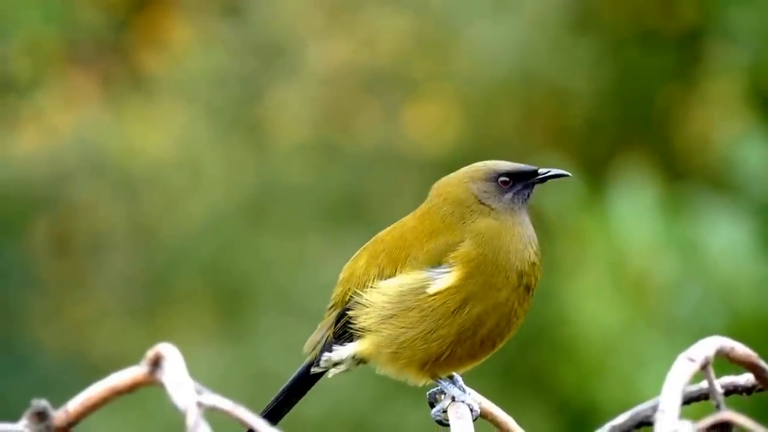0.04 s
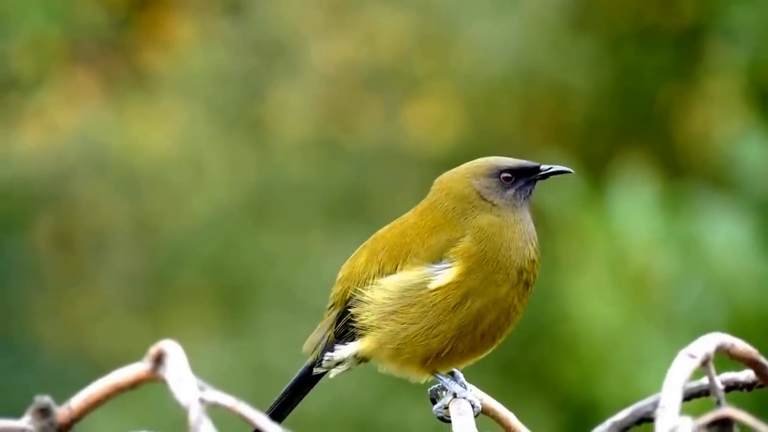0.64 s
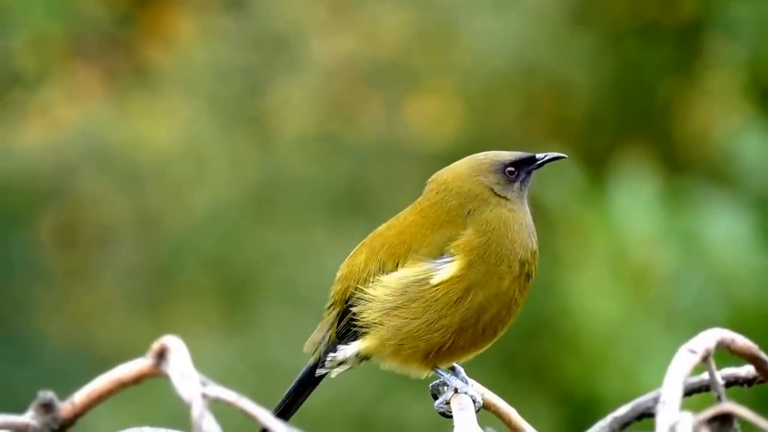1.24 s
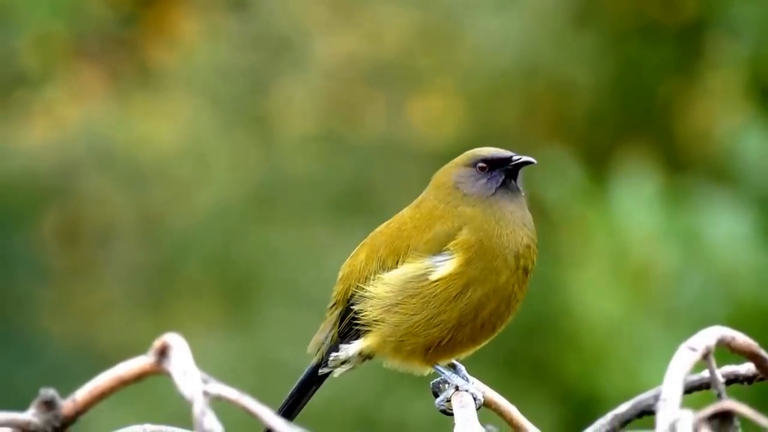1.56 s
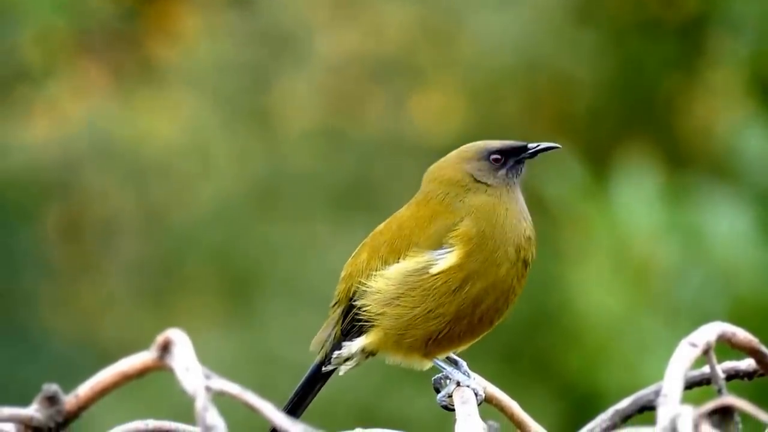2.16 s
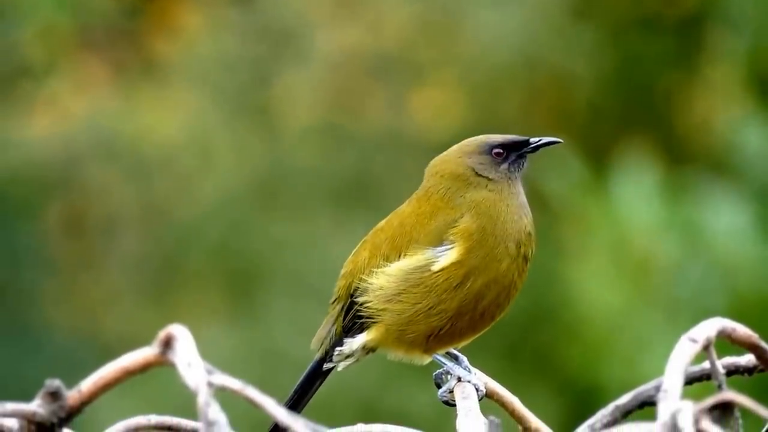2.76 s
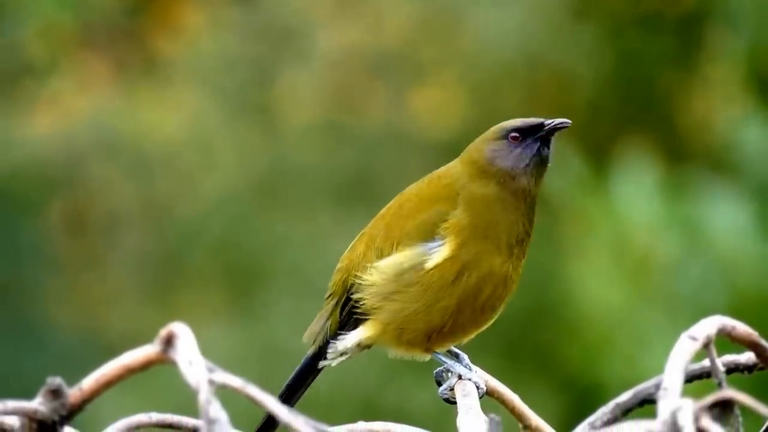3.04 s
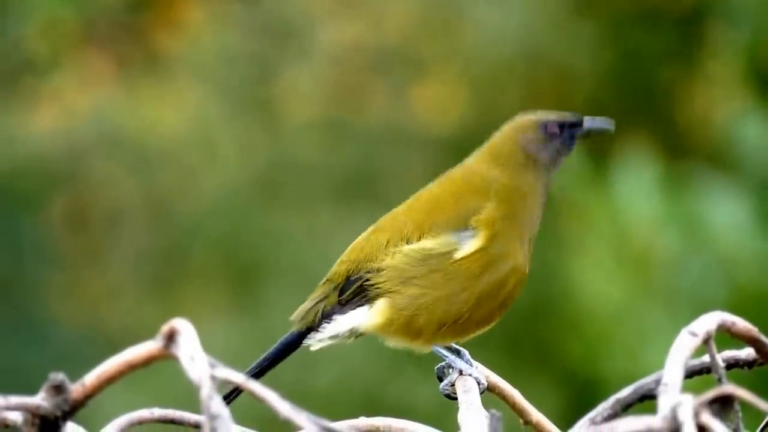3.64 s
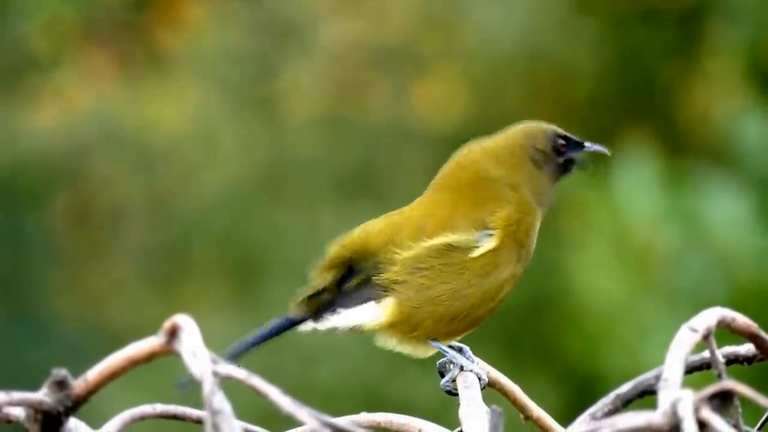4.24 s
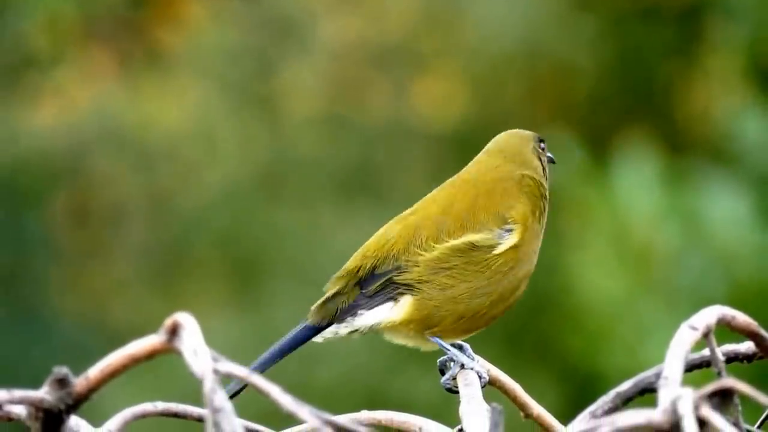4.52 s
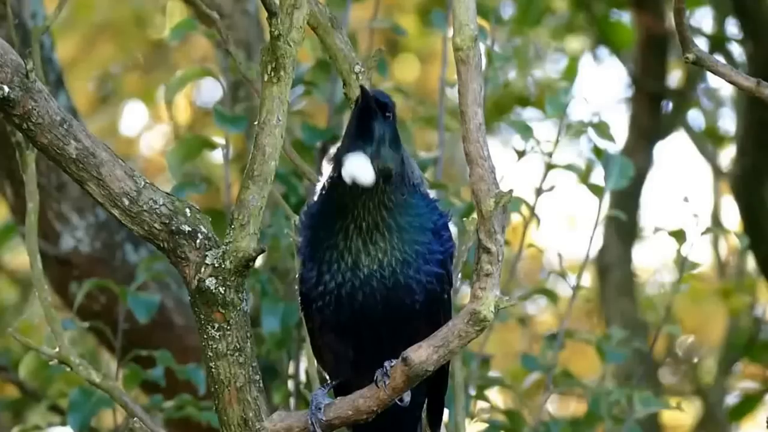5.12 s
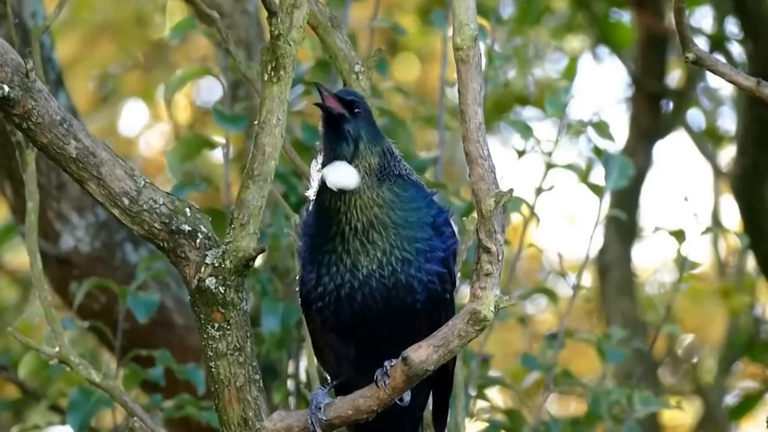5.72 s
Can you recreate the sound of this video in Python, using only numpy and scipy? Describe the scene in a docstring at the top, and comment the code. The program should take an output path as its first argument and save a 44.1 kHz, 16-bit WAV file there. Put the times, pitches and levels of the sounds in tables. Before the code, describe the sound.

Forest birds sing buzzing rasps, falling bell notes, warbles and hoarse chirps over a faint rumble, with one brief dropout.

```python
"""A forest opens on a faint rumble, ticking leaves and thin, far-off whistles; a small bird starts to warble.
At 3 s a bellbird sings close by: its syrinx beats out buzzing rasps that break into falling bell notes.
A distant chord enters just before 5 s, then everything cuts to a quarter second of silence.
Among other trees a tui wheezes, rings one clear bell note and goes on into hoarse chirps."""
import sys
import numpy as np
from scipy import signal
from scipy.fft import rfft, irfft
from scipy.io import wavfile
from scipy.ndimage import uniform_filter1d

SR = 44100
rng = np.random.default_rng(int(sys.argv[2]) if len(sys.argv) > 2 else 0)


def file_out(sig):
    """Save sig as 16-bit WAV at sys.argv[1]."""
    # one column per channel
    cols = np.atleast_2d(sig).T
    # limit, then scale
    lim = np.clip(cols, -1, 1)
    pcm = np.round(lim * 32767).astype(np.int16)
    wavfile.write(sys.argv[1], SR, pcm)


N = 259308
T = np.arange(N) / SR

# Levels in the tables are relative: each layer is shaped and trimmed afterwards.
# The bellbird's falling notes. Each row: start, fall and hold in seconds, top and end pitch in Hz,
# bend (1 is straight, more is steep at first), level in dB.
BELL_NOTES = [(3.243, 0.045, 0.038, 3114, 1208, 1.72, -9), (3.597, 0.051, 0.033, 2800, 1172, 1.8, -28),
              (3.809, 0.042, 0.046, 3213, 1231, 1.7, -12), (3.909, 0.068, .002, 2480, 1278, 1.13, -23.5),
              (4.242, .054, 0.019, 2468, 1393, .85, -13.5), (4.605, 0.031, .012, 1246, 1237, 0.95, -33),
              (4.645, .058, 0.0047, 2550, 1320, 1.2, -29.5)]
# The bell voice's harmonics. Each row: multiple of the pitch, level in dB.
BELL_PARTIALS = [(1, -2), (2, -32), (4, -34), (5, -34.5)]
# The bellbird's rasps. Each row: start and length in seconds, pitch in Hz, level and swell in dB.
RASPS = [(3.026, 0.069, 1771, -37, 10.5), (3.19, 0.054, 1914, -24.5, 14.5), (3.552, .046, 1848, -36, 11),
         (3.759, 0.05, 1930, -25, 15)]
# A rasp's harmonics. Each row: multiple of the pitch, level in dB.
RASP_PARTIALS = [(1, -5.5), (2, 3.5), (3, -15.5), (4, -5), (5, -20.5)]
# Squeals where a rasp breaks into a bell note. Each row: start and length in seconds, level in dB.
SQUEALS = [(3.244, 0.017, -23.5), (3.589, 0.041, -41.5), (3.809, 0.019, -22)]
# The bellbird's sharp clicks. Each row: start in seconds, level in dB.
CLICKS = [(3.359, -48), (4.2285, -27), (4.2345, -33)]
# The bellbird's stereo image. Each row: frequency in Hz, left minus right in dB, left lead in radians.
BELLBIRD_IMAGE = [(1200, .2, .2), (1550, 2.2, -.25), (1850, 1.8, -.25), (2020, -2.5, -.4), (2600, -.3, .15),
                  (6000, .3, 0)]
# The tui's wheezes. Each row: start and length in seconds, centre and width in Hz, level in dB.
WHEEZES = [(5.225, 0.084, 6570, 1700, -47), (5.243, .031, 2670, 502, -47.5), (5.249, .2, 7960, 3470, -59),
           (5.432, 0.039, 5180, 1300, -43.5), (5.576, 0.041, 5460, 900, -51),
           (5.579, 0.023, 10000, 3000, -60), (5.647, .016, 4670, 2390, -43),
           (5.643, 0.018, 9500, 4000, -59)]
# Chirps around the tui, thin whistles and far scratchy calls. Each row: start and length in seconds,
# first, middle and last pitch in Hz, level in dB.
CHIRPS = [(5.458, 0.047, 3655, 4160, 3410, -38.5), (5.459, .07, 8030, 8200, 8270, -51),
          (5.503, 0.069, 3550, 3490, 2480, -41.5), (5.529, 0.048, 2795, 2130, 1890, -40),
          (5.613, 0.042, 3730, 4040, 3400, -42.5), (5.654, .056, 3470, 3530, 2700, -45),
          (5.708, 0.014, 3200, 4030, 4400, -44), (5.717, 0.074, 2980, 3250, 3320, -45),
          (5.796, 0.067, 6400, 5660, 5150, -51)]
WHISTLES = [(0, 0.071, 7100, 6800, 6450, -61.5), (0.409, .27, 4250, 4120, 3800, -64),
            (.98, 0.13, 5440, 4730, 4400, -56.5), (2.056, 0.099, 2520, 2765, 2930, -53.5),
            (3.948, 0.079, 8560, 8350, 8250, -58), (4.053, 0.14, 8600, 8870, 8600, -63),
            (4.105, 0.19, 6100, 6030, 5900, -61.5), (4.289, 0.12, 8900, 8920, 8750, -63.5),
            (4.51, 0.26, 7970, 8730, 8100, -62.5), (4.824, 0.29, 7740, 7280, 7000, -60)]
SCRATCHES = [(0.07, 0.054, 4800, 4000, 3600, -55.5), (0.091, 0.069, 5700, 5050, 4520, -55.5),
             (0.131, 0.069, 3490, 2990, 2720, -61), (0.185, .045, 4600, 4300, 3900, -56),
             (.268, .11, 4300, 4030, 3650, -57), (1.086, 0.16, 4500, 4780, 4900, -64),
             (1.78, .073, 6200, 5570, 5070, -59), (1.956, 0.14, 5100, 4650, 4160, -61.5),
             (2.479, 0.094, 5600, 5230, 3880, -55), (4.11, 0.14, 5330, 4730, 4600, -52.5),
             (4.476, .071, 4900, 4300, 3580, -52), (4.59, 0.079, 3900, 4270, 5340, -48),
             (4.656, 0.049, 4500, 3706, 3220, -45.5), (4.684, 0.044, 2650, 2680, 2780, -49.5),
             (4.821, 0.14, 5000, 4400, 3870, -53.5), (4.86, 0.049, 3210, 2900, 2700, -55)]
# A small bird's calls. Each row: start, length and warble time in seconds, number of swings up or down,
# top and held pitch in Hz, top and held level in dB.
WARBLES = [(2.433, 0.15, .068, 3.44, 5050, 3600, -37.5, -44.5),
           (2.817, 0.19, .069, 3.6, 5020, 3555, -36, -41.5),
           (3.407, 0.19, 0.034, 0.96, 5660, 3850, -35, -38),
           (3.609, 0.19, .072, 3.7, 5030, 3620, -38.5, -44.5),
           (3.976, 0.25, 0.038, 1.1, 5500, 3850, -49, -42)]
# A distant bird's steady chord. Each row: start in seconds, pitch in Hz, level in dB.
CHORD = [(4.868, 1567, -41.5), (4.872, 4720, -47.5), (4.885, 4086, -46)]
# Ticks among the leaves. Each row: start in seconds, level in dB.
LEAF_TICKS = [(.8894, -54), (1.1139, -47.5), (1.2201, -45), (1.4706, -49.5), (1.5638, -48.5), (1.7689, -49),
              (2.0747, -52.5), (2.1435, -51), (2.2942, -55)]
# The fader ride on the foliage's rustle. Each row: time in seconds, level in dB.
RUSTLE_RIDE = [(0.0, -73), (0.43, -66.5), (0.85, -75), (1.35, -68.5), (1.69, -70.5), (2.65, -62),
               (4.31, -75.5), (4.75, -69), (4.85, -75)]
# Faint far-off drones in each setting. Each row: pitch in Hz, level in dB.
FOREST_DRONES = [(95, -63), (376.8, -57), (441.4, -60.5), (581.4, -57.5)]
GROVE_DRONES = [(376.8, -58), (597.5, -57), (710.6, -54)]
# EQ curves for the bellbird's breath and squeal, the leaves and the two rumble beds.
# Each row: frequency in Hz, gain in dB.
THROAT_EQ = [(900, -41), (1750, 2.5), (2700, -24), (3900, 4.5), (4800, -7.5), (5600, 1.5), (6700, -13),
             (7800, -7), (9800, -5.5), (11500, -15.5), (13400, -13.5), (16000, -36)]
SQUEAL_EQ = [(1400, -24), (2500, 12), (3300, -10), (4200, -9), (6500, -24.5), (8000, -1), (10000, -2),
             (11500, -20.5), (16000, -23.5)]
LEAF_EQ = [(1500, -32), (4500, 5), (7500, 0), (10000, 5.5), (13000, -3.5), (16000, -16.5)]
FOREST_EQ = [(18, -104.5), (30, -45.5), (81, -12), (147, -11.5), (374, -1.5), (415, -7.5), (448, -3),
             (978, -7), (2250, -22.5), (2770, -26), (3410, -31.5), (4800, -29), (7830, -42), (10200, -36.5),
             (15000, -47.5)]
GROVE_EQ = [(30, -32), (70, -17), (125, -3.5), (250, -7.5), (380, -5), (700, 0.5), (1250, -8.5), (1600, -7),
            (4000, -18), (8000, -34), (11500, -33), (15000, -47)]


def bellbird(bounce=0.6, echo_s=.004, hiss_db=-28):
    """Rasps, squeals, bell notes and clicks; an echo off a near surface makes the falling notes throb."""
    notes = [bell_note(*row) for row in BELL_NOTES]
    bells = syrinx(notes, waver=0.007, flutter_db=3.5, partials=BELL_PARTIALS, edge_s=0.007)
    bell_envelope = uniform_filter1d(np.abs(bells), size=300)
    hiss = undb(hiss_db) * bell_envelope * noise(THROAT_EQ)  # air rushing through the syrinx
    voice = bells + hiss + rasps()
    voice += noise(SQUEAL_EQ) * sum(undb(db) * puff(start, length) for start, length, db in SQUEALS)
    voice += noise(THROAT_EQ) * strikes(CLICKS, decay_s=0.0036)
    voice += bounce * np.interp(T - echo_s, T, voice)
    return between_ears(voice) + trees(voice, wet_db=-12.5, t60_s=0.42, treble_db=-4.0)


def bell_note(start, fall, hold, top_hz, end_hz, bend, db, throat_hz=1720, throat_q=5.38):
    """A fall to a held pitch, blooming as it passes through the throat's resonance."""
    t = clock(fall + hold)
    hz = end_hz + (top_hz - end_hz) * np.maximum(1 - t / fall, 0) ** bend
    detuning = throat_q * (hz / throat_hz - throat_hz / hz)
    attack_db = 4 * np.maximum(1 - t / .02, 0)
    sag_db = 60 * np.maximum(t - fall, 0)  # the held pitch fades at 60 dB a second
    return start, hz, db - attack_db - sag_db - 10 * np.log10(1 + detuning ** 2)


def rasps(pulse_hz=275, rise=0.052, rough_rad=0.33, hiss_db=-3.5, attack_s=0.021, release_s=0.007):
    """A slightly rising tone chopped into pulses by the beating syrinx, with a puff of hiss in each."""
    out, breath = np.zeros(N), noise(THROAT_EQ)
    loudest_db = max(row[3] for row in RASPS)
    for start, length, hz, db, swell_db in RASPS:
        i = np.flatnonzero((T > start) & (T < start + length + .03))
        t, n = T[i] - start, len(i)
        progress = np.minimum(t / length, 1)
        beat_hz = pulse_hz * (1 + .035 * walk(190, size=n))
        pulses = unit(0.34 + np.sin(phase_of(beat_hz) / 2) ** 2)
        phase = phase_of(hz * (1 + rise * (progress - .5))) + rough_rad * walk(900, size=n)
        third_db = 1.95 * (loudest_db - db)  # softer rasps are thinner: the third harmonic stands out
        tone = unit(sum(undb(level + third_db * (k == 3)) * np.sin(k * phase + rng.uniform(0, 2 * np.pi))
                        for k, level in RASP_PARTIALS))
        swell = undb(db - swell_db * (1 - progress) ** 2)
        fades = np.minimum(t / attack_s, 1) * np.exp(-np.maximum(t - length, 0) / release_s)
        out[i] += swell * fades * pulses * (tone + undb(hiss_db) * breath[i])
    return out


def syrinx(notes, waver, flutter_db, partials=((1, 0),), waver_hz=250, flutter_hz=68, edge_s=0.0037):
    """A bird's near-sine voice on (start, pitch, level) notes; fast, wide wavering makes it scratchy."""
    out = np.zeros(N)
    wobble, flutter = 1 + waver * walk(waver_hz), flutter_db * walk(flutter_hz)
    for start, hz, db in notes:
        i = np.clip(int(start * SR) + np.arange(len(hz)), 0, N - 1)
        fades = signal.windows.tukey(len(i), min(2 * edge_s * SR / len(i), 1))
        phase = phase_of(hz * wobble[i])
        tone = sum(undb(level) * np.sin(k * phase) for k, level in partials)
        out[i] += undb(db + flutter[i]) * fades * tone
    return np.sqrt(2) * out


def between_ears(x):
    """Each pitch reaches the two ears with its own small difference in level and phase."""
    hz, db, lead = np.transpose(BELLBIRD_IMAGE)
    f = np.fft.rfftfreq(N, 1 / SR)
    left = undb(np.interp(f, hz, db) / 2) * np.exp(.5j * np.interp(f, hz, lead))
    return irfft(rfft(x) * np.array([left, 1 / left]), N)


def tui():
    """One clear bell note on the left, amid wheezes and hoarse chirps that ring through the grove."""
    bell = syrinx([tui_note()], waver=.001, flutter_db=1.5)
    chirps = [arc(*row) for row in CHIRPS]
    clear = syrinx(chirps, waver=0.0126, flutter_db=3.5, flutter_hz=162.6)
    hoarse = syrinx(chirps, waver=0.072, flutter_db=7.0, waver_hz=1201)
    chatter = clear * undb(-2.0) + hoarse * undb(-4.5)
    for start, length, hz, width, db in WHEEZES:
        band = [(hz / 2, -40), (hz - width / 2, -3), (hz, 0), (hz + width / 2, -3), (hz + 2 * width, -50)]
        chatter += undb(db) * puff(start, length) * noise(band)
    reverb = trees(bell, wet_db=-8.5, t60_s=0.53, treble_db=-5)
    reverb += trees(chatter, wet_db=-6, t60_s=0.29, treble_db=-1.0)
    return pan(bell, left_db=8.0) + chatter * undb(-1.5) + reverb


def tui_note(start=5.368, attack_s=0.0245, hold_s=0.043, release_s=0.067, hz=1843, scoop_hz=159):
    """The tui's bell scoops down onto its pitch, holds and dies away."""
    t = clock(attack_s + hold_s + release_s)
    settling = np.maximum(1 - t / attack_s, 0)
    dying = np.maximum(t - attack_s - hold_s, 0) / release_s
    db = -28.5 - 24 * (settling + dying)
    return start, hz + scoop_hz * settling, db


def small_birds():
    """Warbles, whistles, scratchy calls and a held chord from deeper in the forest."""
    song = undb(-2) * syrinx([warble(*row) for row in WARBLES],
                             waver=0.0076, flutter_db=4.0, waver_hz=451.7, flutter_hz=88.6)
    whistles = undb(-0.5) * syrinx([arc(*row) for row in WHISTLES],
                                   waver=.007, flutter_db=3.5, flutter_hz=129.3)
    scratches = undb(-2.5) * syrinx([arc(*row) for row in SCRATCHES],
                                    waver=0.039, flutter_db=4.5, waver_hz=1004, flutter_hz=132.2)
    chord = np.sqrt(2) * sum(undb(db) * np.clip((T - start) / 0.015, 0, 1) * np.sin(2 * np.pi * hz * T)
                             for start, hz, db in CHORD)
    reverb = trees(song, wet_db=-2.0, t60_s=0.18, treble_db=0)
    reverb += trees(whistles + scratches, wet_db=0, t60_s=0.52, treble_db=-5.5)
    return song + whistles + scratches + chord + reverb


def warble(start, length, warble_s, swings, top_hz, held_hz, top_db, held_db, arch_hz=197.8, arch_s=.23):
    """The pitch swings between two limits and lands on a gently arching note that fades at its end."""
    t = clock(length)
    angle = np.pi * swings * np.maximum(1 - t / warble_s, 0)
    swing = np.sin(angle / 2) ** 2
    arch = arch_hz * np.sin(np.pi * np.maximum(t - warble_s, 0) / arch_s)
    hz = held_hz + (top_hz - held_hz) * swing + arch
    upstroke_db = 3.5 * np.maximum(-np.sin(angle), 0)  # upward swings are softer
    strain_db = 39 * np.maximum(np.log2(hz / 4900), 0)  # the voice weakens above 4900 Hz
    fade_db = 10 * np.maximum(1 - (length - t) / 0.091, 0)
    return start, hz, held_db + (top_db - held_db) * swing - upstroke_db - strain_db - fade_db


def arc(start, length, from_hz, middle_hz, to_hz, db, swell_db=7):
    """One smooth bow of pitch, loudest in the middle."""
    x = 2 * clock(length) / length - 1
    hz = middle_hz + (to_hz - from_hz) / 2 * x + ((from_hz + to_hz) / 2 - middle_hz) * x ** 2
    return start, hz, db - swell_db * x ** 2


def trees(x, wet_db, t60_s, treble_db):
    """Trunks and leaves scatter a thin reverb tail, mostly alike in both ears; treble_db darkens it."""
    t = T[:SR]
    scatter = rng.standard_normal((3, SR)) * undb(4 * rng.standard_normal(SR))
    tails = scatter * undb(-60 * t / t60_s) * np.minimum(t / .008, 1)
    tails = tails[:2] * 0.41 + tails[2]  # one tail for each ear plus a shared one
    tails /= np.sqrt(np.mean(np.sum(tails ** 2, axis=1)))
    send = colour(x, [(200, 0.006), (2000, 0.0061), (10000, treble_db)])
    return undb(wet_db) * signal.fftconvolve(send[None], tails, axes=1)[:, :N]


def leaves(grain_db=5.5, flicker_db=3.0, trim_db=6):
    """Foliage rustles in a fine crackle, with a few louder ticks."""
    grains = rng.standard_normal(N) * undb(grain_db * rng.standard_normal(N))
    ride_db = trim_db + np.interp(T, *np.transpose(RUSTLE_RIDE)) + flicker_db * walk(45)
    rustle = unit(colour(grains, LEAF_EQ)) * undb(ride_db)
    return rustle + noise(LEAF_EQ) * strikes(LEAF_TICKS, decay_s=0.015)


def rumble(eq, db, width_db):
    """A distant bed that sways a little; the bass sits in the centre."""
    mid = noise(eq) * undb(.5 * walk(9))
    side = colour(noise(eq), [(100, -19), (300, -15.5), (650, -3.0), (3000, 1.0)]) * undb(width_db)
    return undb(db) * np.array([mid + side, mid - side])


def drones(tones, swell_db=3, drift_hz=5):
    """Faint far-off tones that swell and waver."""
    return np.sqrt(2) * sum(undb(db + swell_db * walk(5.1)) * np.sin(phase_of(hz + drift_hz * walk(14)))
                            for hz, db in tones)


def undb(db):
    """Decibels to gain."""
    return 10 ** (np.asarray(db) / 20)


def unit(x):
    """Scale to rms 1."""
    return x / np.sqrt(np.mean(x ** 2))


def clock(length):
    """Seconds since the start of a note."""
    return np.arange(max(int(length * SR), 2)) / SR


def phase_of(hz):
    """Running phase of a pitch curve, in radians."""
    return 2 * np.pi * np.cumsum(hz) / SR


def walk(rate_hz, size=N):
    """Smooth random modulation, spread near 1."""
    k = max(int(SR / rate_hz), 1)
    steps = np.repeat(rng.standard_normal(size // k + 1), k)
    return 1.321 * uniform_filter1d(uniform_filter1d(steps, k), k)[:size]


def colour(x, eq):
    """Apply a (Hz, dB) EQ curve, rolling off below its first point."""
    hz, db = np.transpose(eq)
    f = np.maximum(np.fft.rfftfreq(N, 1 / SR), 1)
    gain = undb(np.interp(np.log(f), np.log(hz), db)) * np.minimum(f / hz[0], 1) ** 2
    return irfft(rfft(x) * gain, N)


def noise(eq):
    """Coloured noise of rms 1."""
    return unit(colour(rng.standard_normal(N), eq))


def puff(start, length):
    """A rounded swell."""
    return np.sqrt(np.abs(np.sin(np.pi * np.clip((T - start) / length, 0, 1))))


def strikes(rows, decay_s):
    """Envelope of hard attacks that die away."""
    return sum(undb(db) * (T >= start) * np.exp(-np.clip((T - start) / decay_s, 0, 20))
               for start, db in rows)


def pan(x, left_db):
    """Make the left channel left_db louder than the right."""
    return x * undb(np.array([[left_db], [-left_db]]) / 2)


def scene(cut_s=4.998, resume_s=5.2575):
    """The bellbird's forest, a hard cut to silence, the tui's grove."""
    forest = bellbird() + small_birds()
    forest += rumble(FOREST_EQ, db=-44, width_db=-8) + drones(FOREST_DRONES) + leaves()
    grove = tui() + rumble(GROVE_EQ, db=-45, width_db=-5) + drones(GROVE_DRONES)
    return forest * (T < cut_s) + grove * (T > resume_s)


def record(dry, top_hz=15700):
    """A steep low-pass takes the very top off the mix."""
    return signal.sosfilt(signal.ellip(10, .1, 80, top_hz, fs=SR, output="sos"), dry)


dry = scene()
out = record(dry)
file_out(out)
```